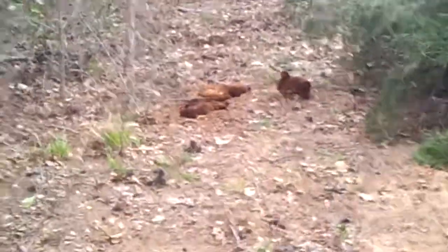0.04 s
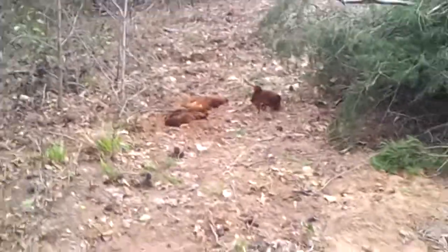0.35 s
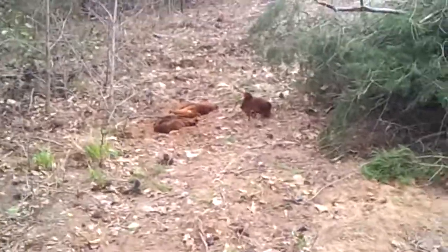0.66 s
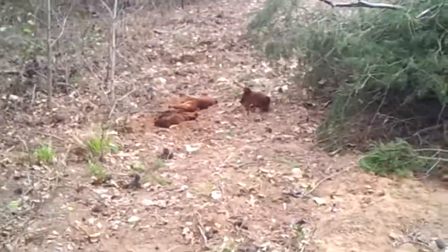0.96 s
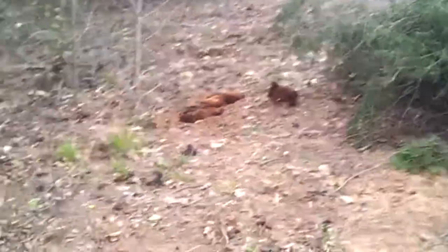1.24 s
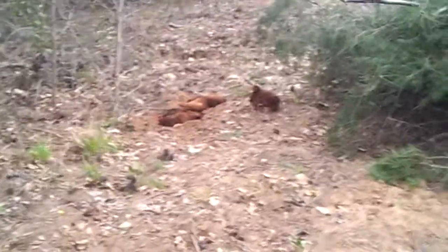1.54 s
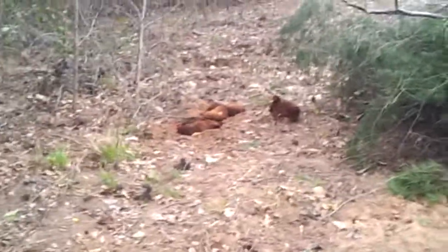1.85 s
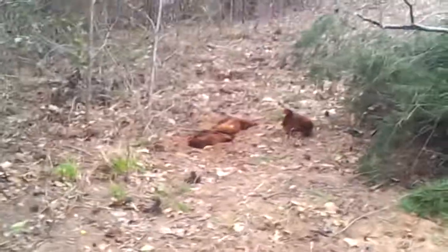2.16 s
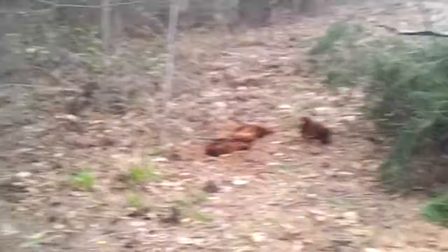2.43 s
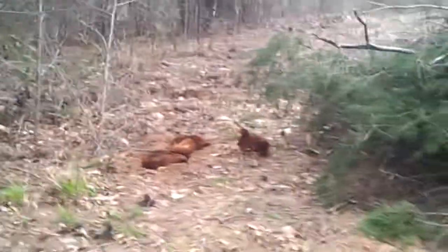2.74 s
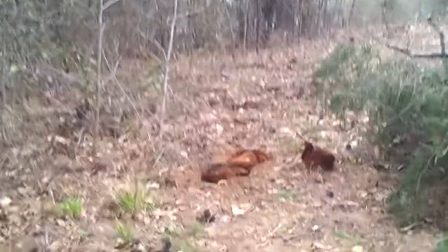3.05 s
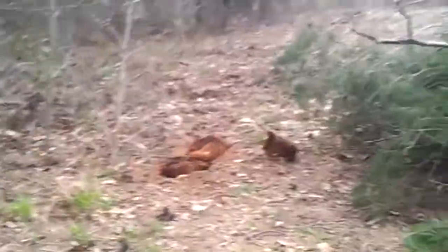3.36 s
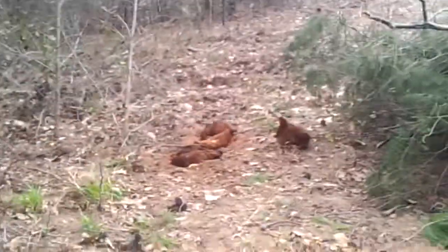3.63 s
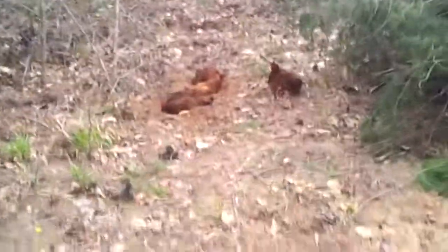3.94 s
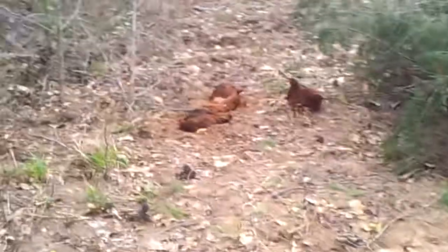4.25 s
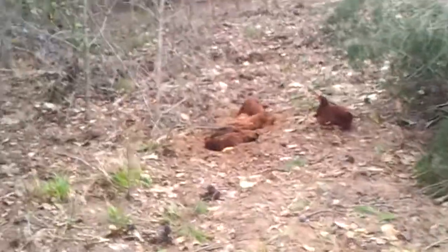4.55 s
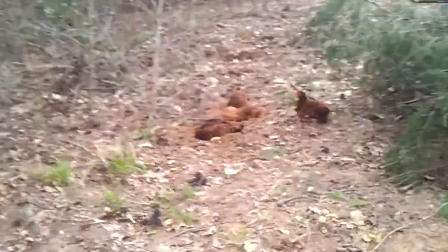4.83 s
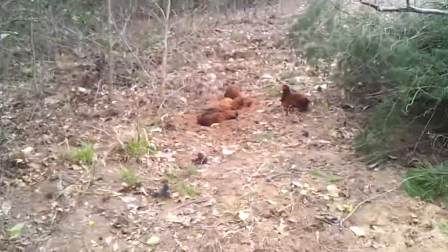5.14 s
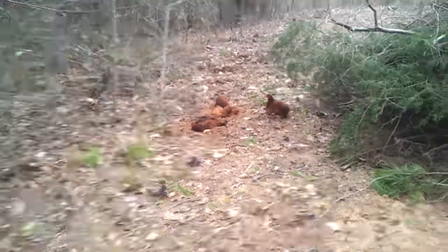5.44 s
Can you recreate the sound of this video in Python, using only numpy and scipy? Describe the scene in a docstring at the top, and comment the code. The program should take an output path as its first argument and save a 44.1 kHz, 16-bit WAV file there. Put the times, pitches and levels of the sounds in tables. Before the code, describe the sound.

Crisp rustling and sharp little ticks come in a quick run as hens scratch through dry leaf litter and throw up soil. After a lull, lighter scrapes and snaps return in fits and starts, with a single brief, low cluck just before the end. Faint woodland air lies behind it all, heard through a hand-held mono microphone that takes a few soft bumps.

```python
"""Hens dust-bathing in the woods

Hens scratch on a wooded slope. Each stroke of a foot or wing crushes dry leaves and throws up soil
that patters down; stems and twigs snap, and one hen gives a short low cluck. Behind them are quiet
woodland air and a few soft handling bumps on a hand-held mono microphone."""
import sys
import numpy as np
from scipy import signal
from scipy.fft import rfft, irfft
from scipy.io import wavfile

SR = 44100
rng = np.random.default_rng(int(sys.argv[2]) if len(sys.argv) > 2 else 0)


def inscribe(sig):
    """Save sig as 16-bit PCM at rate SR to the path in sys.argv[1].

    A 1-D sig is mono; a 2-D sig holds one channel per row.
    Samples are clipped to [-1, 1] before scaling.
    """
    pcm = np.round(np.clip(np.atleast_2d(sig).T, -1, 1) * 32767)
    wavfile.write(sys.argv[1], SR, pcm.astype(np.int16))


N = 246519
TIME = np.arange(N) / SR


def from_db(db):
    """Decibels to gain."""
    return 10 ** (np.asarray(db) / 20)


def unit_rms(x):
    """Scale to an rms of 1."""
    return x / np.sqrt(np.mean(x ** 2) + 1e-20)


def automation(rows):
    """Join timed breakpoints into one curve for each column after the time."""
    times, *columns = np.transpose(rows)
    return [np.interp(TIME, times, column) for column in columns]


def drift(rate_hz):
    """Smooth random wander with an rms of 1."""
    hop = 40
    pole = np.exp(-2 * np.pi * rate_hz * hop / SR)
    noise = rng.standard_normal(N // hop + 2002)
    slow = signal.lfilter([1], [1, -2 * pole, pole * pole], noise)[2000:]   # skip the filter's run-in
    return np.interp(np.arange(N) / hop, np.arange(len(slow)), unit_rms(slow))


def butter(x, hz, kind, order=2):
    """Butterworth low-pass or high-pass."""
    sections = signal.butter(order, np.clip(hz, 10, .47 * SR), kind, fs=SR, output="sos")
    return signal.sosfilt(sections, x + 1e-18)


def resonance(x, hz, width_hz):
    """Band-pass with a gain of 1 at its peak."""
    hz, width_hz = np.clip([hz, width_hz], 20, SR / 3)
    return signal.lfilter(*signal.iirpeak(hz, hz / width_hz, fs=SR), x + 1e-18)


def ring(clicks, hz, t60):
    """Each click starts a sine that dies by 60 dB in t60 seconds."""
    decay, angle = from_db(-60 / (t60 * SR)), 2 * np.pi * hz / SR
    return signal.lfilter([0, np.sin(angle)], [1, -2 * decay * np.cos(angle), decay ** 2], clicks + 1e-18)


def add(out, start_s, sound):
    """Mix a short sound in at its start time."""
    start = int(np.clip(round(start_s * SR), 0, N - 1))
    out[start:start + len(sound)] += sound[:N - start]


def equalise(x, spectrum, size=1024):
    """Minimum-phase EQ through points of frequency and gain."""
    point_hz, point_db = np.transpose(spectrum)
    hz = np.maximum(np.arange(size // 2 + 1) * SR / size, 1)
    gain = from_db(np.interp(np.log(hz), np.log(point_hz), point_db))
    cepstrum = irfft(np.log(gain))
    cepstrum[1:size // 2] *= 2
    cepstrum[size // 2 + 1:] = 0   # nothing rings ahead of a click
    impulse = irfft(np.exp(rfft(cepstrum)))
    return signal.fftconvolve(x, impulse)[:N]


# The tone of the air bed. Each row: frequency in Hz, relative level in dB.
AIR_EQ = [(25, -32), (45, -2), (80, 2.5), (105, 3), (160, -5.5), (400, -7), (800, -9.5), (1500, -9),
          (2900, -11), (5000, -10.5), (8000, -11), (12400, -13), (14500, -15)]


def air(level_db=-62.5):
    """Still woodland: a faint hiss over a gently wavering far rumble."""
    bed = unit_rms(equalise(rng.standard_normal(N), AIR_EQ, size=8192))
    rumble = butter(bed, 166, "low")
    swell = from_db(0.86 * drift(7.0))
    return from_db(level_db) * (bed + rumble * (swell - 1))


# A soft low rush swells and fades. Each row: time in seconds, level in dB.
RUSH_FADES = [(3.15, -88.5), (3.21, -66.5), (3.32, -67), (3.42, -71), (3.55, -71), (3.7, -86.5)]
# A thin ringing comes and goes. Each row: time in seconds, level in dB.
RINGING_FADES = [(1.5, -89), (1.68, -70.5), (1.9, -70), (2.05, -81.5), (2.4, -77), (3.1, -94.5),
                 (3.28, -65), (3.65, -82.5), (3.9, -86.5)]


def faint_bands():
    """Two faint bands of noise: a soft low rush that swells and fades, and a thin far-off ringing."""
    (rush_db,), (ringing_db,) = automation(RUSH_FADES), automation(RINGING_FADES)
    low, high = rng.standard_normal((2, N))
    rush = unit_rms(butter(butter(low, 124, "high"), 550, "low", order=4))
    ringing = unit_rms(resonance(resonance(high, 2100, 310), 2020, 450))
    return from_db(rush_db) * rush + from_db(ringing_db) * ringing


# Handling noise, and at 3.17 s the low body of a knock on the ground. Each row: start in seconds, wobble level
# in dB, wobble pitch in Hz, # wobble 60 dB decay in seconds, knock level in dB, knock pitch in Hz.
HANDLING_BUMPS = [(2.721, -48.5, 105, 0.043, -39.5, 243), (3.1712, -64, 199.7, 0.032, -46, 453),
                  (3.905, -50.5, 91.5, 0.092, -75, 400)]


def handling_bumps(size=8000):
    """A knock sets off a brief low wobble: a finger on the case, or at 3.17 s a beak or foot on the ground."""
    out, touch = np.zeros(N), signal.unit_impulse(size)
    for start, wobble_db, wobble_hz, t60, knock_db, knock_hz in HANDLING_BUMPS:
        wobble = from_db(wobble_db) * ring(touch, wobble_hz, t60)
        knock = from_db(knock_db) * ring(touch, knock_hz, t60=2.5 / knock_hz)
        add(out, start, wobble + knock)
    return butter(out, 49, "high")


def woodland_echo(x, level_db=-20.5, t60=0.3, size=12000):
    """Trunks and ground scatter a faint, short tail."""
    t = np.arange(size) / SR
    scatter = rng.standard_normal(size) * (t > .003) * from_db(-60 * t / t60)
    tail = butter(scatter, 7000, "low")
    return from_db(level_db) * signal.fftconvolve(x, tail / np.sqrt(np.sum(tail ** 2)))[:N]


# The falling cluck. Each row: time in seconds, pulse rate in Hz, pulse level in dB.
CLUCK_CONTOUR = [(5.389, 198, -79), (5.395, 195.5, -49), (5.405, 172, -54), (5.418, 155.5, -50),
                 (5.432, 152, -69)]
# The hen's throat and body. Each row: resonance in Hz, width in Hz, relative level in dB.
FORMANTS = [(266, 450, 2), (740, 140, 2), (1220, 220, -24.5), (1660, 300, -27)]


def cluck():
    """A handful of slowing pulses ring the hen's throat."""
    pulse_hz, level_db = automation(CLUCK_CONTOUR)
    sounding = (TIME >= CLUCK_CONTOUR[0][0]) & (TIME <= CLUCK_CONTOUR[-1][0])
    jitter = 1 + 0.019 * drift(90)
    cycles = np.cumsum(sounding * pulse_hz * jitter) / SR
    pulses = np.diff(np.ceil(cycles), prepend=0) * from_db(level_db)   # one click a cycle
    voice = sum(from_db(db + 5.5) * ring(pulses, hz, t60=np.log(1000) / (np.pi * width_hz))
                for hz, width_hz, db in FORMANTS)
    return butter(voice, 150, "high")


# A feather or claw drags over one leaf.
# Each row: centre in seconds, half length in seconds, level in dB, ring in Hz, width in Hz.
LEAF_SCRAPES = [(0.528, 0.013, -43, 2720, 1800), (1.026, 0.0079, -52, 3700, 1200),
                (1.094, 0.0084, -35, 3760, 4000), (2.641, 0.0099, -48, 3300, 2220),
                (2.902, 0.016, -60, 3300, 4000), (4.179, 0.044, -50.5, 3760, 1400),
                (5.141, 0.035, -54.5, 9960, 2500), (5.143, 0.035, -55.5, 5700, 1800)]


def leaf_scrapes(slips_per_s=5000):
    """Fast uneven slips drive the leaf's resonance."""
    out = np.zeros(N)
    slips = rng.standard_normal(N) * (rng.random(N) < slips_per_s / SR)
    for centre, half_s, level_db, hz, width_hz in LEAF_SCRAPES:
        leaf = unit_rms(resonance(resonance(slips, hz, width_hz), hz, 2 * width_hz))
        swell = np.exp(-((TIME - centre) / half_s) ** 2)
        out += from_db(level_db) * swell * leaf
    return out


def clods(soil_db, per_s=70, ring_cycles=7, bands=9):
    """Lumps in the thrown soil land with small dull thuds."""
    landings = (rng.random(N) < per_s / SR) * rng.uniform(-0.69, 1, N)
    band = rng.integers(0, bands, N)
    thuds = sum(ring(landings * (band == k), hz, t60=ring_cycles / hz)
                for k, hz in enumerate(np.geomspace(190, 1000, bands)))
    return from_db(soil_db - 15.5) * unit_rms(thuds)


def leaf_rib_breaks(leaf_db, firm_stroke_db=-47, firm_per_s=30, spread_db=2.1, spread_octaves=0.27):
    """Cue rows for snaps(): leaf ribs break at random, more often and louder under a harder stroke."""
    force_db = leaf_db - firm_stroke_db
    per_s = firm_per_s * from_db(0.57 * force_db)
    at = np.flatnonzero(rng.random(N) < per_s / SR)
    strength, pitch = np.clip(rng.standard_normal((N, 2))[at], -2, 2).T
    level_db = -40 + 0.59 * force_db[at] + spread_db * strength
    hz = 5400 * 2 ** (spread_octaves * pitch)
    return list(zip(at / SR, level_db, hz, 0.97 * hz))


# The loudest stems and twigs snapping.
# Each row: start in seconds, level over 1 ms in dB, ring in Hz, width in Hz.
TWIG_SNAPS = [(0.025, -36, 4400, 5900), (0.039, -33, 4160, 4200), (0.0478, -26, 5600, 3900),
              (0.0601, -27.5, 5180, 5200), (0.0814, -35, 7100, 5000), (0.1412, -33, 6240, 4400),
              (0.194, -32.5, 5700, 4000), (0.2326, -33, 4300, 2960), (0.28, -31.5, 5100, 3600),
              (0.2944, -27, 4100, 5770), (0.3118, -33, 3840, 2700), (0.321, -29.5, 5540, 3900),
              (0.3397, -30, 5800, 5700), (0.346, -24.5, 4570, 4180), (0.3497, -19, 3870, 2480),
              (0.4178, -32.5, 6200, 4200), (0.7096, -32, 9150, 4930), (0.888, -42.5, 7660, 11000),
              (1.0035, -36.5, 5440, 7100), (1.07, -46, 5400, 3940), (1.1166, -28.5, 4480, 2200),
              (1.2072, -37, 3650, 5200), (1.2176, -25, 5600, 7300), (1.239, -26, 5140, 4570),
              (1.255, -34, 4500, 2320), (1.283, -36, 3630, 2570), (1.3298, -34, 5230, 7100),
              (1.3978, -32, 7260, 2620), (1.4255, -27, 7000, 2390), (1.6547, -36, 4960, 3450),
              (1.6734, -43, 4630, 4530), (1.7962, -49, 2660, 3800), (1.8565, -44.5, 2100, 1950),
              (2.0368, -36, 4580, 5960), (2.0385, -40, 13700, 3500), (2.0573, -39, 6550, 1590),
              (2.0808, -32, 4840, 3600), (2.6205, -40.5, 5180, 7470), (2.6843, -41, 5620, 5400),
              (2.8152, -34.5, 5570, 1930), (2.9183, -32.5, 8500, 8400), (2.9669, -27, 10600, 8000),
              (2.997, -32, 7500, 5300), (3.3469, -40, 3140, 4360), (3.3686, -40.5, 4540, 4500),
              (3.4018, -35, 6200, 5770), (3.4261, -39, 7660, 11170), (3.5172, -40, 5040, 3700),
              (3.6318, -37, 4650, 4250), (3.6613, -41.5, 5500, 7700), (3.714, -47, 2800, 3000),
              (3.7515, -35.5, 5060, 2440), (4.049, -46.5, 10030, 10900), (4.0974, -38.5, 7300, 9600),
              (4.3658, -38, 3480, 4800), (4.381, -36, 4750, 3500), (4.399, -37.5, 5200, 7100),
              (4.5724, -46, 6800, 8000), (5.5328, -36, 5300, 4480), (5.5343, -34, 10460, 2370)]
# A beak or foot knocks on wood or firm ground. Each row: the same columns as the twig snaps.
GROUND_KNOCKS = [(0.0476, -42.5, 1350, 1980), (0.248, -47, 1410, 1500), (0.3488, -43.5, 910, 490),
                 (0.7092, -47.5, 900, 1500), (0.8869, -42, 895, 1820), (3.1105, -38, 1650, 1380),
                 (3.172, -43.5, 700, 900), (4.097, -45.5, 790, 1490), (5.052, -50.5, 900, 900)]


def snaps(rib_breaks, crumble_db=-20, crumble_s=0.0015, size=700):
    """A sharp break or knock rings the stem for about a millisecond while its last fibres crumble."""
    out, t = np.zeros(N), np.arange(size) / SR
    for start, level_db, hz, width_hz in TWIG_SNAPS + GROUND_KNOCKS + rib_breaks:
        crumble = from_db(crumble_db) * rng.standard_normal(size) * np.exp(-t / crumble_s)
        force = (t == 0) + crumble
        stem = resonance(resonance(force, hz, 0.83 * width_hz), hz, 1.24 * width_hz)
        damping = width_hz / hz   # well-damped stems crack more than they ring
        crack = from_db(-17) * damping * butter(force, 0.37 * hz, "high")
        snap = stem + crack
        rms_over_1ms = np.sqrt(np.sum(snap ** 2) / (SR * 1e-3))
        add(out, start, from_db(level_db) * snap / rms_over_1ms)
    return out


def grains(spectrum, per_s, spread_db, max_spreads, q, rub_db, patchy_db=3.0, bands=14):
    """Tiny fractures of uneven size, each ringing briefly at its own pitch, over smooth rubbing."""
    at = np.flatnonzero(rng.random(N) < per_s / SR)
    size_db = spread_db * np.minimum(rng.exponential(1, N)[at], max_spreads)
    sizes = from_db(size_db) * rng.choice([-1, 1], N)[at]
    band, crackle = rng.integers(0, bands, N)[at], 0
    for k, hz in enumerate(np.geomspace(spectrum[0][0], spectrum[-1][0], bands)):
        patchiness = from_db(patchy_db * drift(3.2)[at])   # the pieces underfoot keep changing
        clicks = np.zeros(N)
        clicks[at] = sizes * (band == k) * patchiness
        crackle = crackle + resonance(clicks, hz, hz / q)
    rubbing = unit_rms(equalise(rng.standard_normal(N), spectrum))
    return unit_rms(unit_rms(equalise(crackle, spectrum)) + from_db(rub_db) * rubbing)


# The tone of crisp leaves, dull soil and fine grit. Each row: frequency in Hz, relative level in dB.
LEAF_EQ = [(900, -25.5), (1700, -10), (2600, -5), (3900, 0), (5200, -2), (7200, -3.5), (9000, -14.5),
           (14000, -20.5)]
SOIL_EQ = [(150, -19.5), (300, -8), (600, -0.5), (1100, 2), (1900, 2), (2600, 5), (4000, -16.5)]
GRIT_EQ = [(5000, -15), (7500, -2.5), (9000, -1.5), (10800, -1.5), (12400, -9), (13800, 0.5), (15000, -11)]


def leaf_litter(leaf_db, soil_db, grit_db):
    """A harder stroke breaks more leaves per second and moves more soil and grit."""
    per_s = 2900 * from_db(.5 * (leaf_db + 50.5))
    catch = from_db(1.17 * drift(37))   # claws catch and slip within a stroke
    leaves = grains(LEAF_EQ, per_s, spread_db=6.0, max_spreads=3.2, q=5.5, rub_db=0.5)
    soil = grains(SOIL_EQ, .7 * per_s, spread_db=4.0, max_spreads=2.2, q=0.96, rub_db=0.5)
    grit = grains(GRIT_EQ, per_s, spread_db=5.0, max_spreads=4.1, q=1.4, rub_db=-3)
    return catch * (from_db(leaf_db - 1.24) * leaves
                    + from_db(soil_db - 2.6) * soil
                    + from_db(grit_db - 1.5) * grit)


# Strokes of a foot or wing. Each row: start in seconds, hold in seconds, leaf drive in dB,
# then soil and grit drive in dB relative to the leaves.
HEN_STROKES = [(0.0, 0.019, -44.5, -9.5, -5), (0.033, 0.011, -43.5, -20, -4), (0.093, 0.065, -46, -24, -9),
               (0.184, .13, -51, -35, -4.5), (0.356, 0.012, -46, -19, -4.5), (0.4, 0.043, -44, -13, -7.5),
               (0.505, 0.099, -48.5, -9.5, -6.5), (0.703, .07, -55, -8.5, -12),
               (0.87, 0.03, -56, -9.5, -13), (0.999, 0.043, -57, -1.5, -2),
               (1.086, 0.01, -38.5, -20, -10.5), (1.132, 0.0089, -45.5, -15, -3),
               (1.218, 0.21, -49, -18, -4), (1.476, 0.14, -48.5, -11, -8.5), (1.995, 0.19, -58, -14, -2.5),
               (2.638, 0.012, -58.5, -16, 3.5), (2.887, 0.042, -49, -4.5, 4.5),
               (2.979, 0.026, -46.5, -17, -3.5), (3.106, 0.035, -54.5, -2.5, -15),
               (3.297, 0.05, -63, -6, -1), (3.363, .11, -54, -19, -2), (3.58, 0.13, -57.5, -21, -2),
               (4.146, 0.045, -54.5, -6, 1.5), (4.255, 0.087, -58.5, -1.5, -2.5),
               (4.365, 0.046, -51, -9, -4), (4.508, 0.093, -61, 0, -6.5), (4.647, 0.048, -57, -6, -5),
               (5.009, .15, -56, -8, -2), (5.226, 0.097, -56, -8, -1.5), (5.521, 0.019, -57.5, -6, 0.5)]


def strokes(attack_s=0.024, release_s=0.025, debris_db=-10, settle_s=0.17):
    """Drive in dB for leaves, soil and grit: the foot digs in, leaves spring back, debris settles."""
    idle = from_db([[-67.5], [-72.5], [-69]])   # the hens shift between strokes
    power = idle ** 2 * np.ones(N)
    debris = from_db(debris_db)
    for start, hold, leaf_db, soil_db, grit_db in HEN_STROKES:
        before, after = np.maximum(start - TIME, 0), np.maximum(TIME - start - hold, 0)
        rise = np.exp(-(before / attack_s) ** 2)
        fall = (1 - debris) * np.exp(-after / release_s) + debris * np.exp(-after / settle_s)
        gains = from_db([[leaf_db], [leaf_db + soil_db], [leaf_db + grit_db]])
        power += (gains * rise * fall) ** 2
    return 10 * np.log10(power)


def scene():
    """The hens and their faint echo over the woods and handling noise, alike in both channels."""
    leaf_db, soil_db, grit_db = strokes()
    background = air() + faint_bands() + handling_bumps()
    hens = leaf_litter(leaf_db, soil_db, grit_db) + clods(soil_db) + leaf_scrapes() + cluck()
    hens += snaps(leaf_rib_breaks(leaf_db))
    mono = background + hens + woodland_echo(hens)
    return np.array([mono, mono])


def record(dry):
    """A steep low-pass takes off the very top."""
    cutoff_hz = 14600
    return signal.sosfilt(signal.ellip(10, .2, 70, cutoff_hz, fs=SR, output="sos"), dry)


dry = scene()
out = record(dry)
inscribe(out)
```